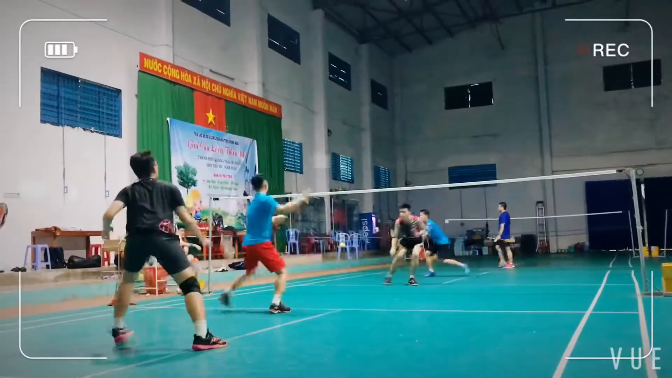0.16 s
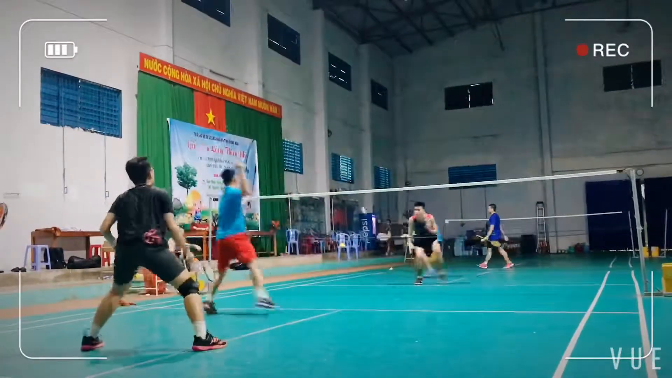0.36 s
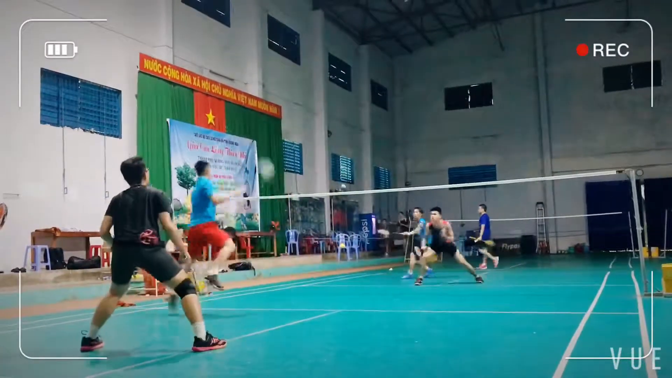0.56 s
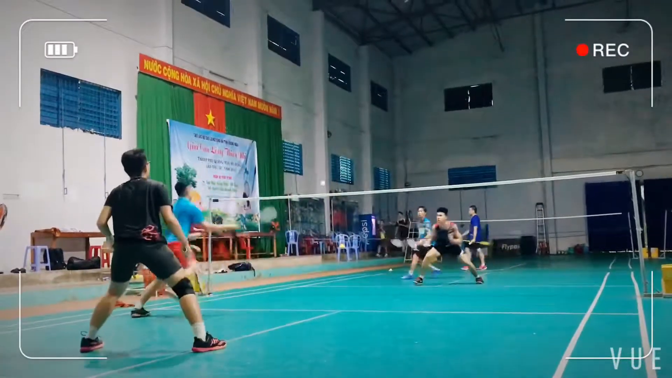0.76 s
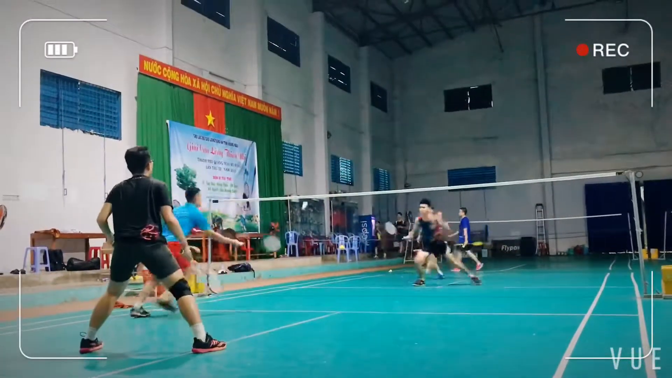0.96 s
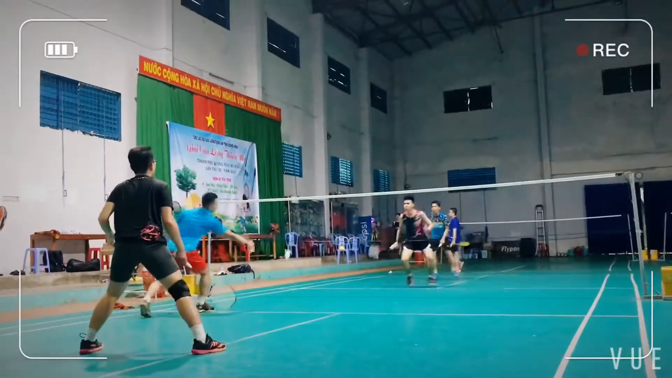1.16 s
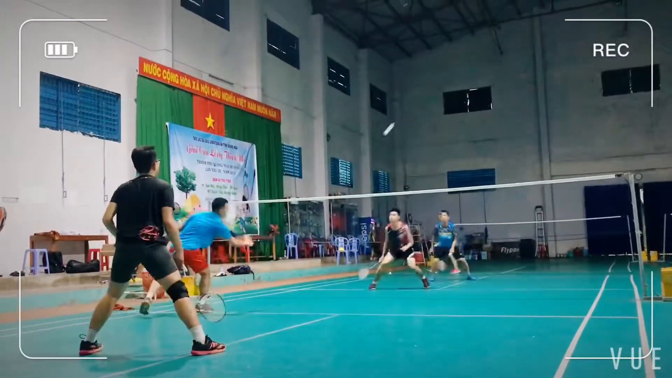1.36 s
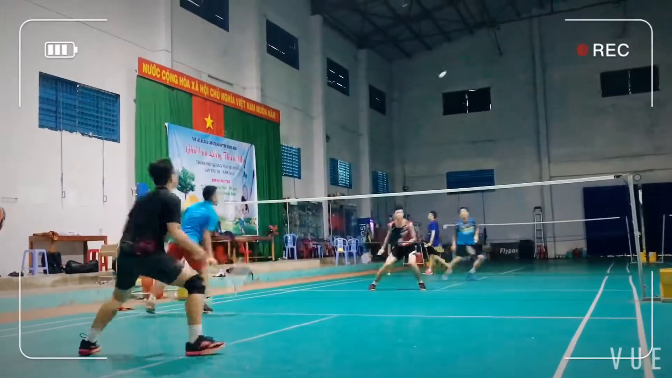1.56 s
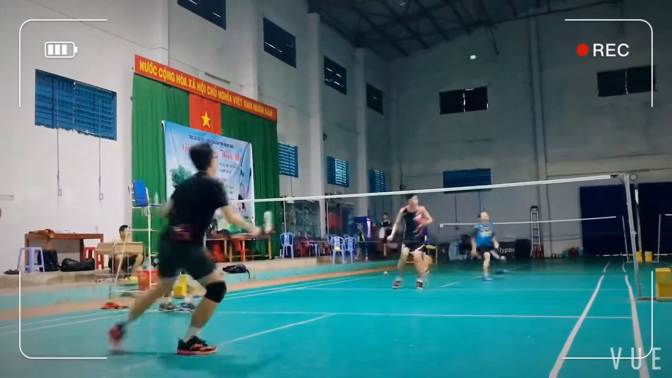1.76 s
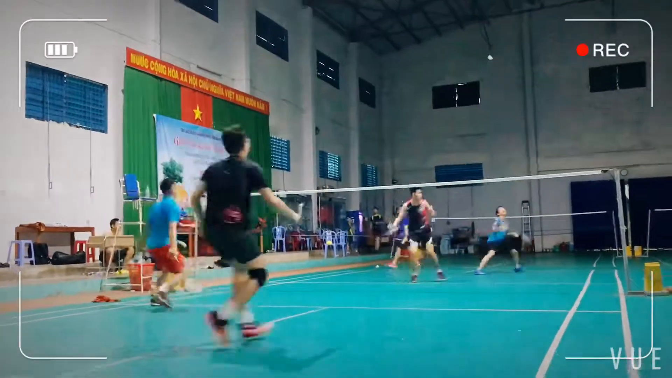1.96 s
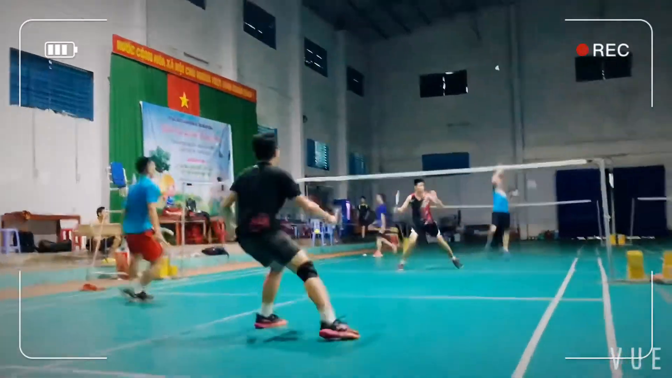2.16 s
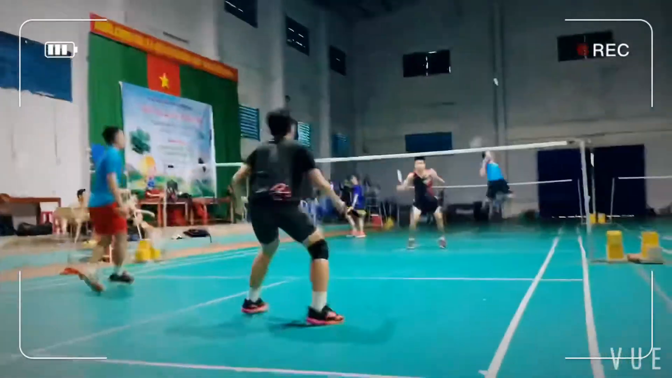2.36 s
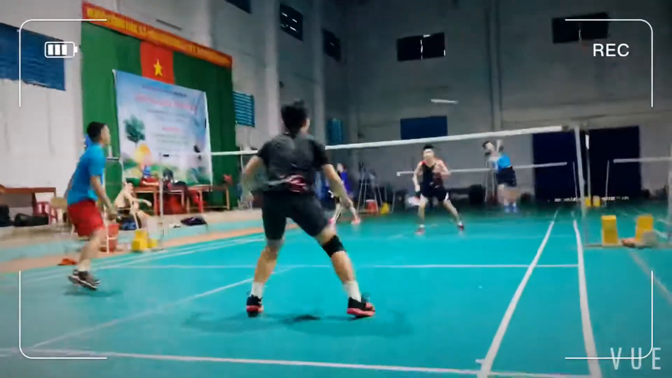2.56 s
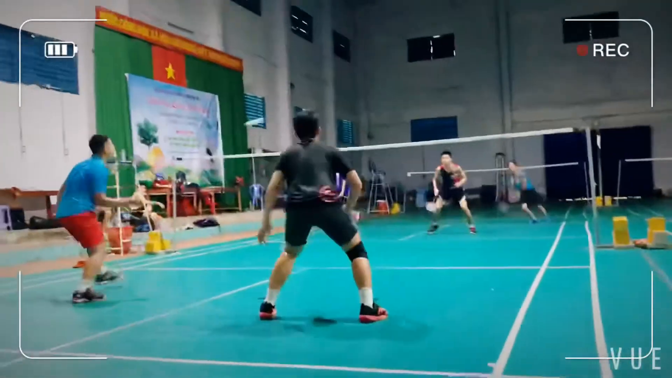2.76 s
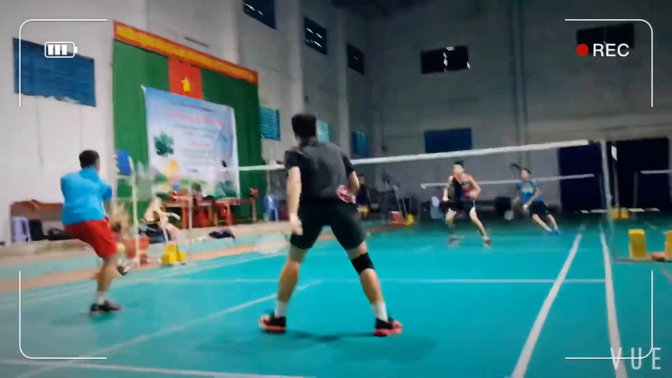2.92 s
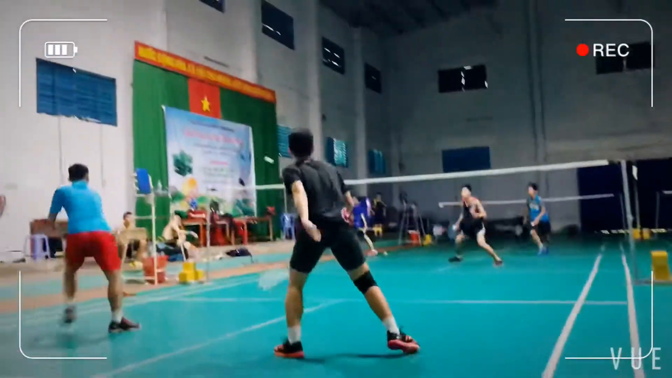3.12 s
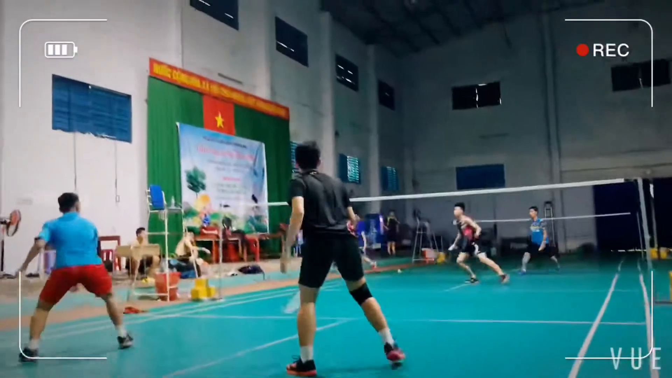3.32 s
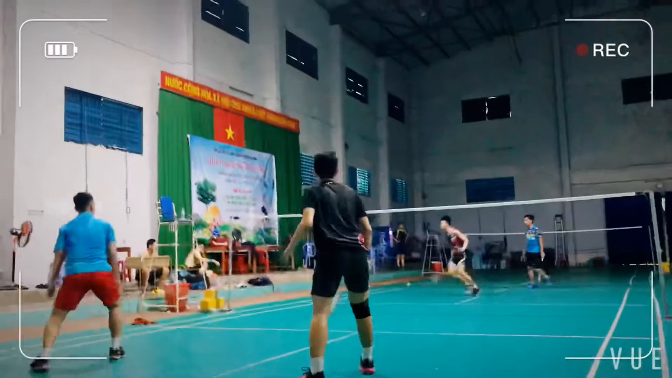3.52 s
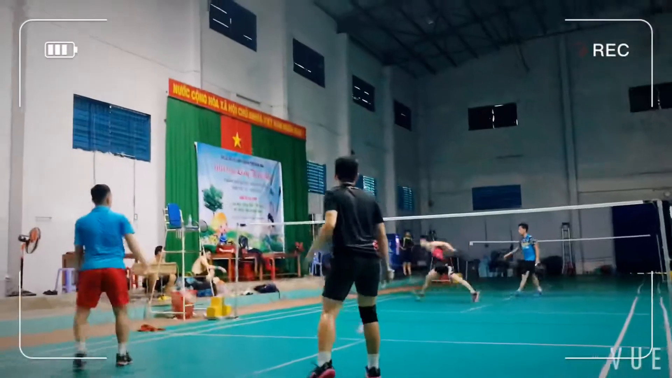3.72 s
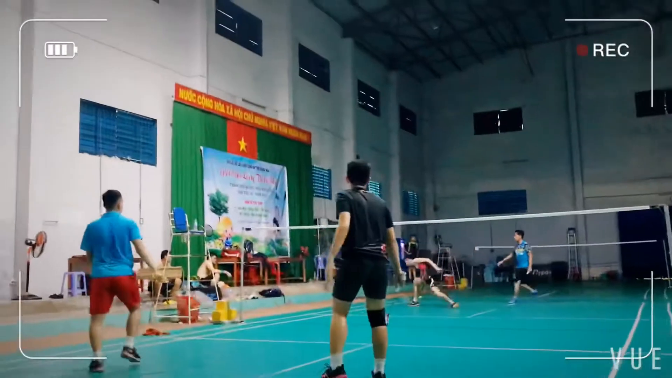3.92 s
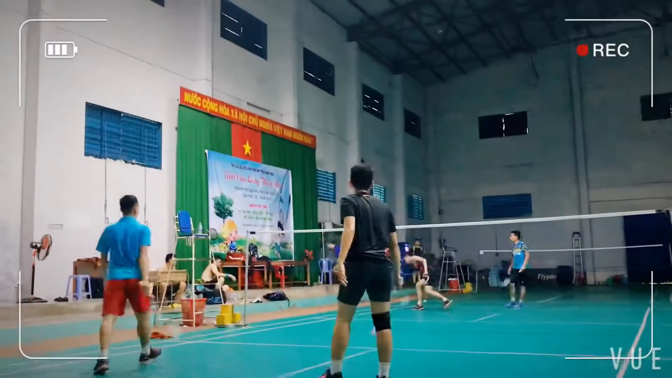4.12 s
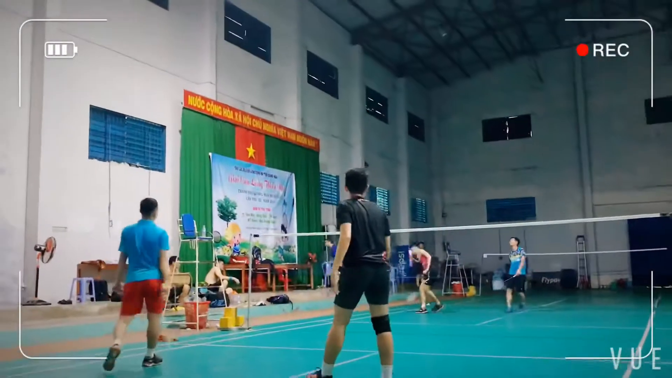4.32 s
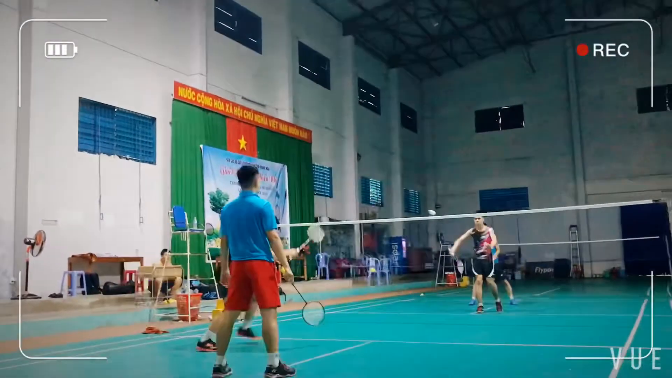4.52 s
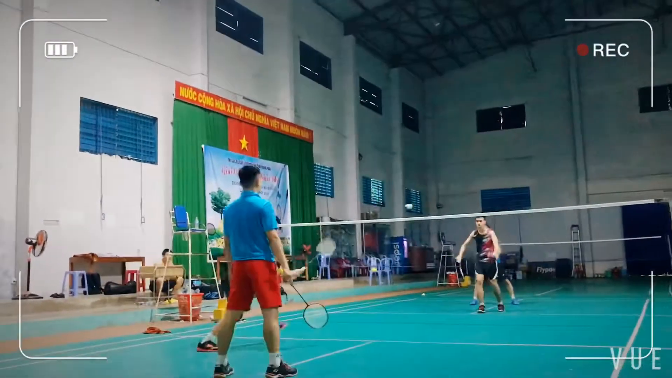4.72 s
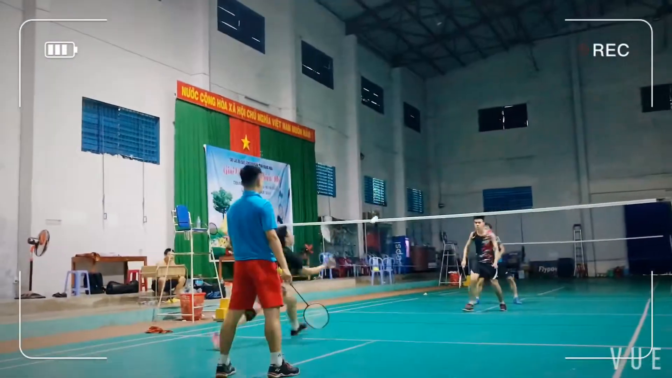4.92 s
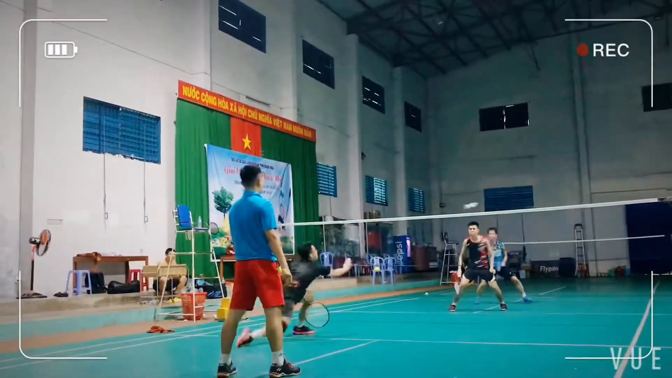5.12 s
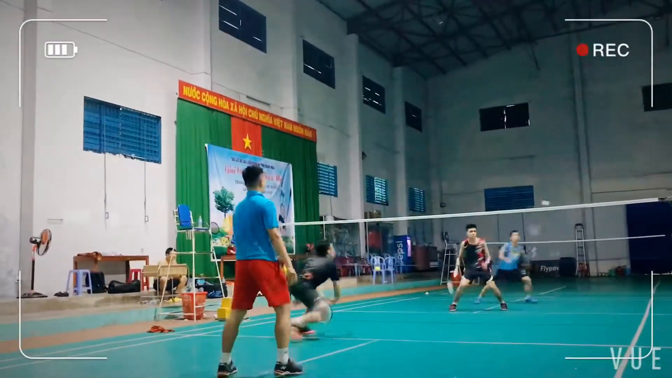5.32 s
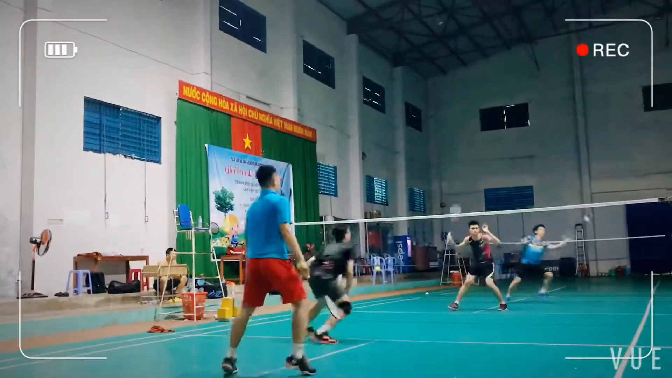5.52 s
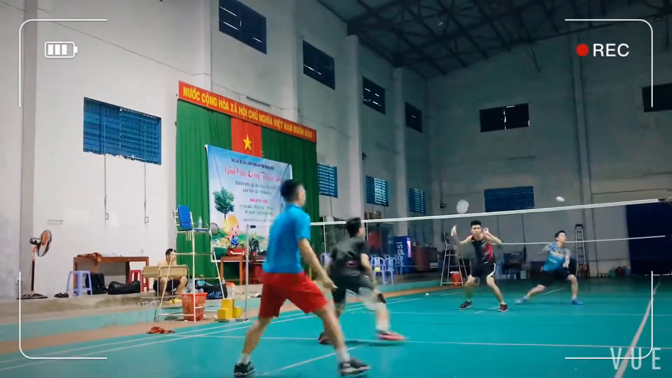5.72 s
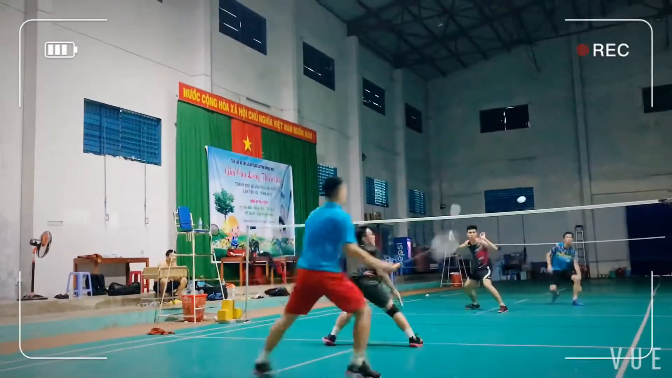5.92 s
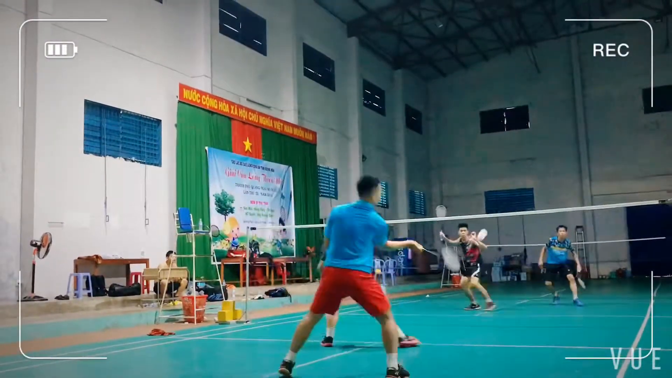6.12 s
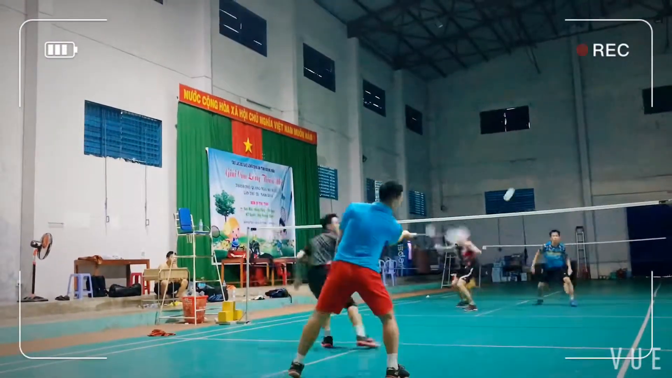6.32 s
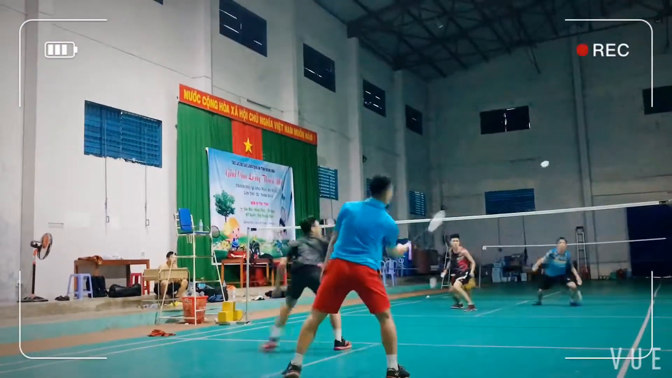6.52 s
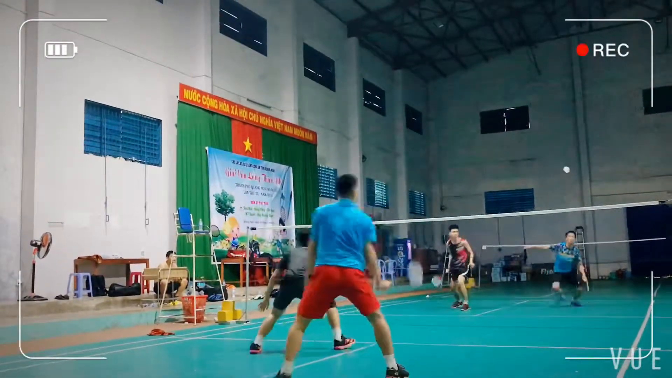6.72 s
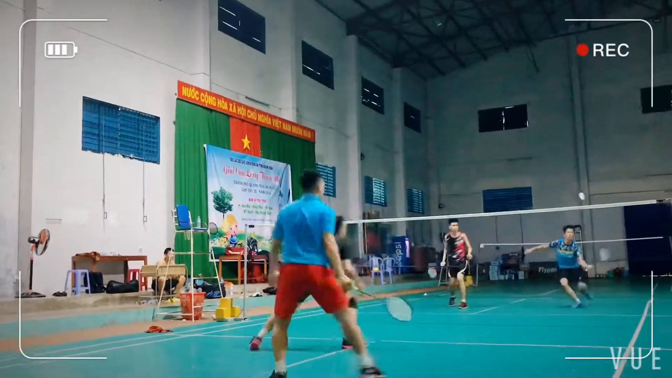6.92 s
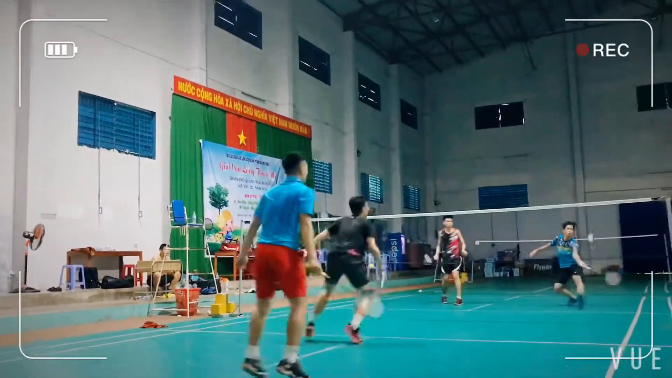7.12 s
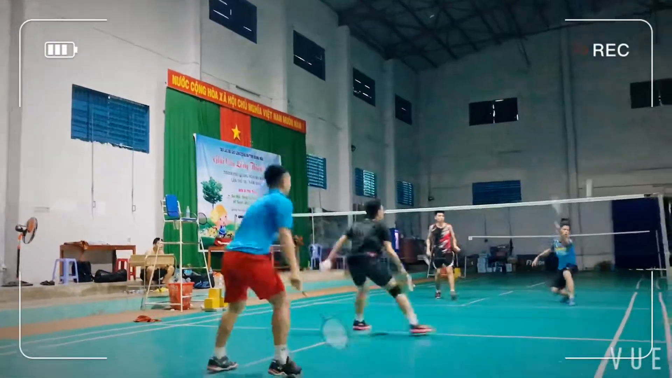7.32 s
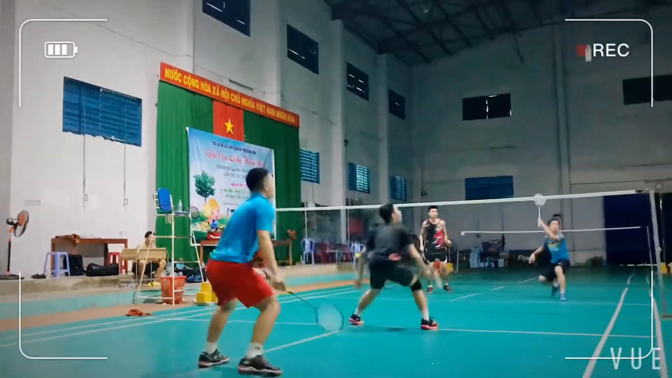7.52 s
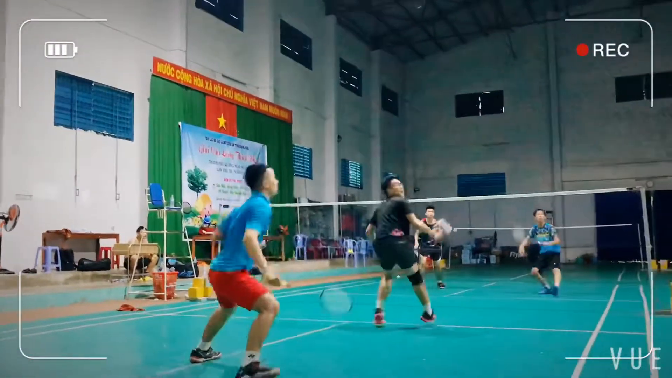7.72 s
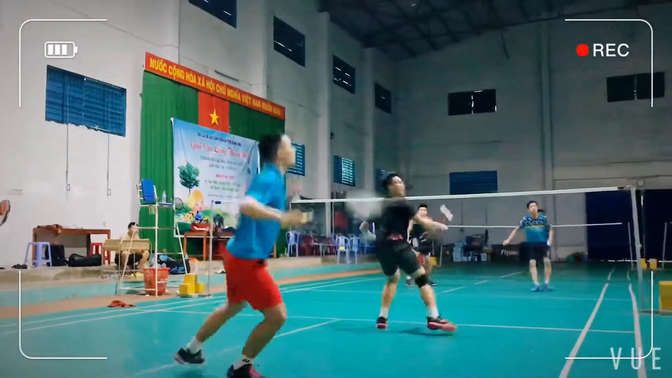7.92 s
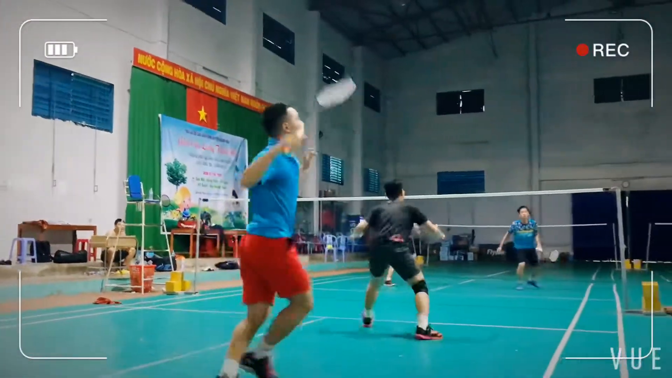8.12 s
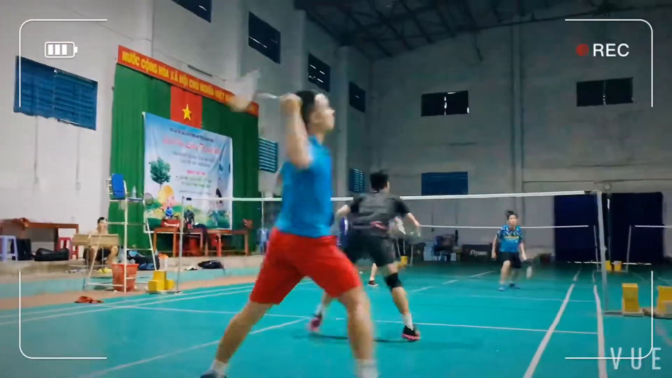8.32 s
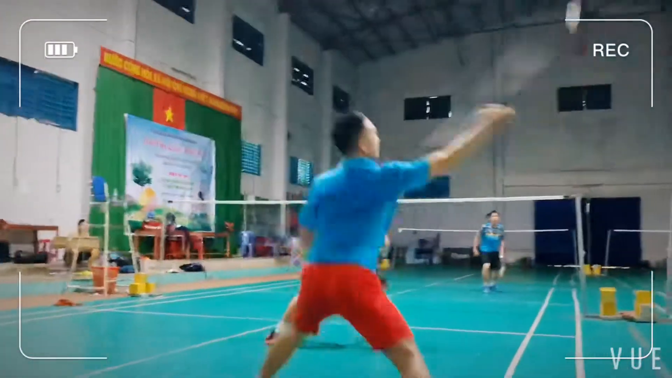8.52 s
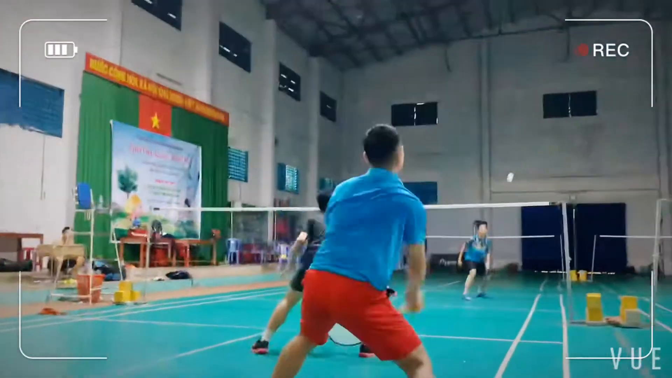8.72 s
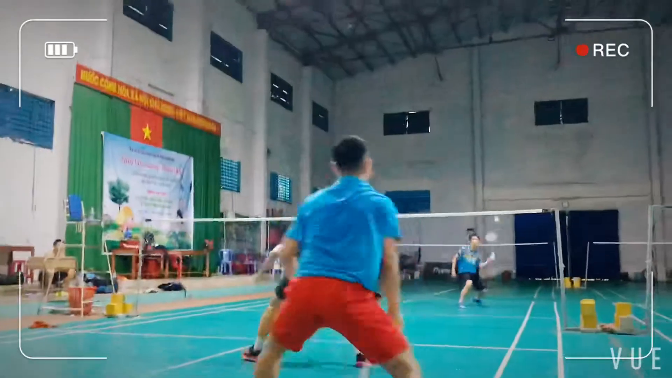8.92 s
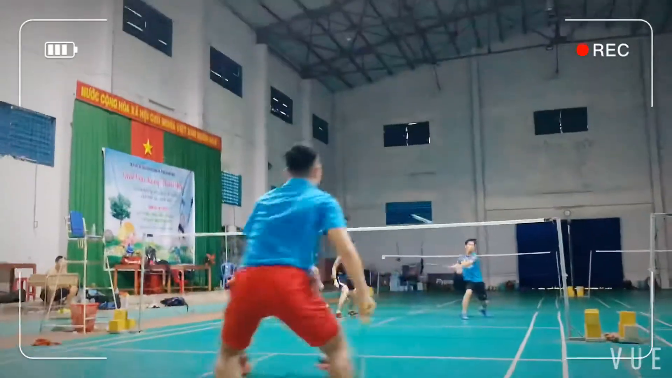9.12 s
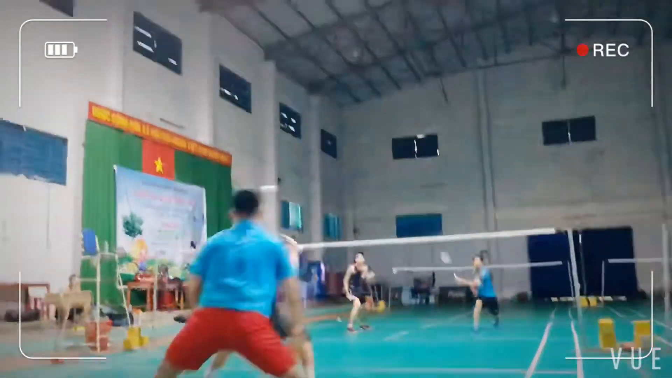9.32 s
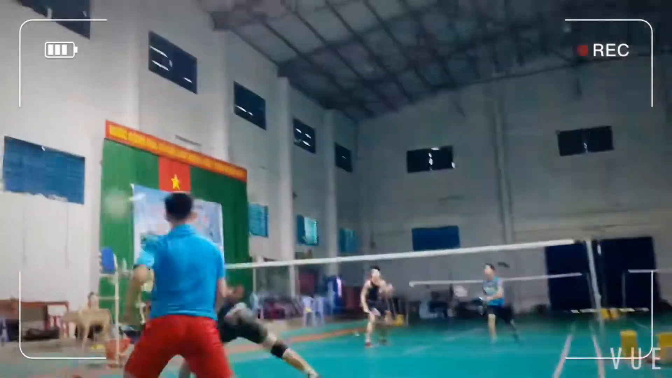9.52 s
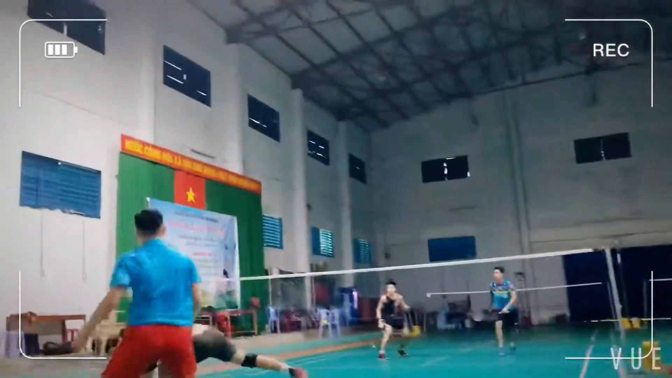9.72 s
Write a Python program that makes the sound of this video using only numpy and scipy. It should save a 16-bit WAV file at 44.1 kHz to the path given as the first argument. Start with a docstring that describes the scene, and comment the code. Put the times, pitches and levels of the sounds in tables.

```python
"""A large, hard-walled hall during a badminton rally, heard by one microphone behind the court.
Filtered noise makes the uneven background wash and rumble; a dying cloud of noise makes the hall ring on.
Light taps, mostly of shoes, are bursts of noise; landings thump with low sines, and rubber soles squeak
with gliding tones and their overtones.
Each racket stroke is one sharp click sent through resonances, with ringing strings and frame."""
import sys
import numpy as np
from scipy import signal
from scipy.fft import rfft, irfft, next_fast_len
from scipy.io import wavfile
from scipy.ndimage import uniform_filter1d, map_coordinates

SR = 44100
rng = np.random.default_rng(int(sys.argv[2]) if len(sys.argv) > 2 else 0)


def persist_wave(psi):
    """Save psi, clipped to +-1, as 16-bit WAV."""
    counts = np.round(np.clip(psi, -1, 1) * 32767).astype(np.int16)
    wavfile.write(sys.argv[1], SR, np.atleast_2d(counts).T)


N = 430857  # length in samples


def amp(db):
    """Turns decibels into a plain multiplier."""
    return 10 ** (np.asarray(db) / 20)


def unit(x):
    """Scales a sound to an average (RMS) strength of 1."""
    return x / np.sqrt(np.mean(x ** 2) + 1e-20)


def noise(size):
    """Plain white noise, a fresh random number for each sample."""
    return rng.standard_normal(size)


def along(points, hz):
    """Reads a curve of (Hz, value) points at any pitch, on a logarithmic pitch axis."""
    point_hz, value = np.transpose(points)
    return np.interp(np.log(hz + 1), np.log(point_hz + 1), value)


def filtered(x, response):
    """Multiplies the spectrum of x by a response, which is a function of frequency."""
    size = next_fast_len(x.shape[-1] + 8192)  # spare room for the filter to ring out
    spectrum = rfft(x, size) * response(np.fft.rfftfreq(size, 1 / SR))
    return irfft(spectrum, size)[..., :x.shape[-1]]


def resonance(centre_hz, width_hz):
    """The response of one damped resonator, which favours pitches near its centre."""
    return lambda f: 1j * f * width_hz / (centre_hz ** 2 - f * f + 1j * f * width_hz)


def wobble(size, rate):
    """A smooth random curve through a given number of random points a second."""
    points = noise(int(size * rate / SR) + 4)
    return map_coordinates(points, [np.arange(size) * rate / SR])


def ring(modes, t, scale=1, last=1):
    """Adds up dying sines, each at a slightly random strength."""
    total = 0
    for hz, db, t60 in modes:
        level_db = db + rng.normal(0, 2) - 60 * t / (t60 * last)
        total = total + amp(level_db) * np.sin(2 * np.pi * hz * scale * t)
    return total


def smeared(x, t60):
    """Scatters x off many small surfaces into a short cloud of copies that dies by 60 dB in t60 seconds."""
    size = SR // 10
    cloud = amp(-60 * np.arange(size) / SR / t60) * noise(size)
    return signal.fftconvolve(x, cloud / np.linalg.norm(cloud))[:len(x)]


def add(pair, s, sound, hall_db, near=0):
    """Lays a sound on the direct path and, hall_db apart, on the path into the hall; near is only direct."""
    start = round(s * SR)
    both = np.array([sound + near, amp(hall_db) * sound])[:, :N - start]
    pair[:, start:start + both.shape[1]] += both


def background():
    """A patchy wash and a lumpy rumble that rise and fall, with the wavering blade tone of fans."""
    # background level over time, with the stroke's ringing in the hall around 2.86 s:
    # start_s, rumble_db, wash_db
    background_levels = [(0.0, -46, -35), (0.73, -46, -36.5), (1.09, -46.5, -36), (2.2, -44, -36),
                         (2.72, -44, -37), (2.86, -44, -32), (3.7, -41, -35.5), (4.6, -43.5, -36),
                         (4.81, -39.5, -34.5), (5.58, -41.5, -33.5), (5.85, -38, -33.5), (8.05, -41.5, -34),
                         (8.3, -39, -35), (8.93, -39, -33), (9.77, -38.5, -33.5)]
    # balance of pitches in the wash: pitch_hz, level_db (per Hz)
    wash_colour = [(100, -40), (270, -5.5), (470, -11), (640, -4.5), (1300, -4), (1600, -5), (2500, -6),
                   (2900, -12.5), (4600, -18), (7000, -24.5), (7700, -29), (9300, -28.5), (10400, -38.5),
                   (12000, -31.5), (16000, -41)]
    # balance of pitches in the rumble: pitch_hz, level_db (per Hz)
    rumble_colour = [(12, -51), (20, -21), (30, -25), (48, 1), (134, 0.5), (184, -4.5), (245, -7),
                     (300, -23.5), (390, -31), (660, -120)]
    # blade tone of the fans: pitch_hz, width_hz, level_db
    fan_tone = (127.5, 1.6, -56.5)

    point_s, *columns = np.transpose(background_levels)
    rumble_db, wash_db = [np.interp(np.arange(N) / SR, point_s, column) for column in columns]

    # random patches of time and pitch make the wash uneven
    spectrum = signal.stft(noise(N), nperseg=512)[2]
    patches = uniform_filter1d(noise(spectrum.shape), 6, 0)
    patches = uniform_filter1d(patches, 12, 1)
    patchy = signal.istft(spectrum * amp(0.93 * unit(patches)), nperseg=512)[1][:N]

    wash = unit(filtered(patchy, lambda hz: amp(along(wash_colour, hz))))
    rumble = unit(filtered(noise(N), lambda hz: amp(along(rumble_colour, hz))))
    fan_hz, width_hz, fan_db = fan_tone
    blade = unit(filtered(noise(N), resonance(fan_hz, width_hz)))

    wash = amp(wash_db + 0.39 * wobble(N, rate=24)) * wash
    rumble = amp(rumble_db + 1.3 * wobble(N, rate=6.6)) * rumble
    return wash + rumble + amp(fan_db) * blade


def hall(x):
    """Echoes too dense to tell apart: a tail of noise that builds up, then dies, each pitch at its own pace."""
    # how long the hall rings: pitch_hz, t60_s (time to die by 60 dB)
    hall_ring = [(100, 5), (300, 7.3), (1000, 3.4), (3000, 3.75), (7000, 2.7), (14000, 0.93)]
    hz, t, spectrum = signal.stft(noise(3 * SR), SR, nperseg=256)
    build = 1 - np.exp(-(t / 0.021) ** 2)
    decay = amp(-60 * t / along(hall_ring, hz)[:, None])
    tail = signal.istft(spectrum * build * decay, SR, nperseg=256)[1]
    return signal.fftconvolve(x, tail / np.linalg.norm(tail))[:N]


def taps():
    """Light taps and scuffs: a short puff of gritty noise with a duller slap."""
    # light taps and scuffs, mostly of shoes; the one at 2.679 may be a stroke's echo:
    # start_s, grit_db, slap_db (over the grit)
    tap_list = [(0.3585, -40, 19), (1.311, -31, -6), (1.409, -31, 4), (2.116, -43, -1), (2.6195, -40, 11),
                (2.679, -22, -7), (3.0121, -33.5, -21), (5.310, -47, 21), (5.696, -27.5, -4),
                (5.761, -34, 16), (6.313, -32, -16), (7.367, -34, 5), (8.188, -41.5, 9), (8.4965, -29, 11),
                (8.559, -43.5, 13), (9.281, -31, 3), (9.723, -35, 12.5)]
    rise_s, decay_s = 0.00022, 0.0017
    pair, t = np.zeros((2, N)), np.arange(SR // 16) / SR
    shape = (1 - np.exp(-t / rise_s)) * np.exp(-t / decay_s)
    for s, grit_db, slap_db in tap_list:
        grit = unit(filtered(noise(len(t)), resonance(9700, 12000)))
        slap = unit(filtered(noise(len(t)), resonance(2800, 1700)))
        add(pair, s, amp(grit_db) * (grit + amp(slap_db) * slap) * shape, hall_db=-9)
    return pair


def thumps():
    """Landings on the mat: the sprung floor gives one low push, a sine that dies fast."""
    # landings: start_s, level_db, floor_hz, t60_s (time to die by 60 dB), hall_db
    landings = [(4.683, -24.5, 132, 0.066, -16), (5.691, -16, 127, 0.032, -10),
                (5.761, -6.5, 261, 0.019, 1.5), (6.424, -21, 130, 0.039, -3.5), (9.179, -31, 217, 0.068, 5),
                (9.372, -28, 164, 0.06, 3), (9.519, -42, 165, 0.06, 2), (9.72, -6.5, 163, 0.021, 4.5)]
    pair, t = np.zeros((2, N)), np.arange(SR // 4) / SR
    rise = 1 - np.exp(-t / 0.0016)
    for s, level_db, floor_hz, t60, hall_db in landings:
        push = np.sin(2 * np.pi * floor_hz * t) * rise
        add(pair, s, amp(level_db - 60 * t / t60) * push, hall_db)
    return pair


def squeaks():
    """Rubber sticks and slips thousands of times a second; two patches of sole beat, uneven grip shakes them."""
    # squeaks: loudest_s, swell_s, fade_s, first_hz, loudest_hz, last_hz (slip rates), tone_db,
    # unsteadiness (0-1), second_overtone_db, loss_db (each further overtone),
    # second_patch_ratio (its slip rate over the first), second_patch_db, hall_db
    squeak_list = [ (0.055, .007, 0.0068, 3000, 3350, 3400, -29, 0.63, -16, 13, 0.86, -6, -16),
                   (0.074, .013, 0.026, 3480, 2990, 2950, -30.5, 0.24, -9.5, 12, 1.3, -18, -6),
                   (0.364, .004, 0.02, 3780, 3500, 3580, -27, 0.26, -17, 21, .83, -5, -14),
                   (1.183, .007, .011, 3680, 3690, 3660, -44, 0.22, -3, 9, 1.2, -12, 10.5),
                   (1.202, .012, 0.016, 3557, 3180, 2910, -32.5, 0.49, -12, 16, 1.07, -8, 0.5),
                   (1.706, .008, 0.0086, 2240, 2237, 2330, -34.5, 0.45, -11, 5, 1, -10, -1.5),
                   (2.553, .008, 0.02, 3454, 3365, 3530, -30, .6, -9, 26, 1.11, -3, -2.5),
                   (2.569, .009, 0.034, 3560, 3480, 3200, -16.5, 0.14, -16, 15, 1, -6, -21),
                   (2.599, .008, 0.0072, 3140, 2910, 2670, -25, 0.28, -17, 13, 1.2, -8, -18),
                   (3.098, .008, 0.0095, 2750, 2420, 2390, -29, .2, -17, 4, 1.04, -12, -30),
                   (4.642, .009, 0.016, 2490, 2460, 2370, -35, 0.24, -7.5, 2.5, 1.02, -7, -8),
                   (5.345, .007, 0.01, 2680, 2595, 2560, -28.5, 0.1, -11, 13, 1.2, -18, -23),
                   (5.79, .03, 0.018, 3700, 3370, 3320, -25.5, .22, -11.5, 1.5, 1.12, -12, -7),
                   (5.807, .012, 0.014, 3020, 2923, 2890, -17, 0.18, -14, 10, 1.16, -9, -11),
                   (5.881, .011, 0.0097, 2844, 2827, 3040, -20, 0.49, -10.5, 9.5, 1.05, -2, -9),
                   (6.093, .008, 0.013, 2710, 2660, 2580, -31, 0.33, -7, 16, .95, -9, -19),
                   (6.159, .005, 0.014, 3140, 3000, 2720, -33, 0.48, -5, 15, 1.04, -4, -5.5),
                   (6.957, .006, 0.0083, 2570, 2500, 2470, -38, .33, -2.5, 19, 0.83, -8, 3),
                   (7.211, .006, .016, 3800, 3630, 3270, -33, .2, -15, 10, 1.17, -16, -4.5),
                   (7.495, .009, 0.011, 2870, 2845, 2370, -23.5, .4, -10, 1.5, 1.16, -6.5, -7.5),
                   (7.899, .005, 0.0055, 3430, 3220, 3110, -20, 0.14, -3, 23, 1.12, -23, -14),
                   (8.163, .011, 0.02, 2600, 2638, 2620, -35.5, 0.34, -3.5, 11, 1.01, -10, 3),
                   (8.486, 0.0087, 0.019, 2445, 2290, 2410, -27, 0.57, -8, 12, 0.86, -14, -3),
                   (8.503, .018, .021, 2562, 2567, 2600, -24.5, 0.64, -12.5, 6, 1.2, -7.5, -13)]
    # scraping noise: steady_grip_db, gain_db (at full unsteadiness)
    scrape_levels = (-29, 29)
    edge_db, edge_shape = 8, 1.58  # level lost at either end; roundness of the swell
    pair = np.zeros((2, N))
    for (s, swell, fade, first_hz, peak_hz, last_hz, tone_db, rough,
         second_db, loss_db, ratio, patch_db, hall_db) in squeak_list:
        t = np.arange(-swell, fade, 1 / SR)  # zero at the loudest moment
        hz = np.interp(t, [-swell, 0, fade], [first_hz, peak_hz, last_hz])
        sag_db = -edge_db * np.abs(np.where(t < 0, t / swell, t / fade)) ** edge_shape

        overtones_db = [0, *(second_db - loss_db * np.arange(4))]  # the first is the slip rate itself
        tone = 0
        for rate_hz, level_db in ((hz, 0), (hz * ratio, patch_db)):
            shaken_hz = rate_hz * (1 + 0.09 * rough * wobble(len(t), rate=524))
            phase = 2 * np.pi * np.cumsum(shaken_hz) / SR
            for number, overtone_db in enumerate(overtones_db, start=1):
                shake_db = 8.0 * rough * wobble(len(t), rate=382)
                tone = tone + amp(level_db + overtone_db + shake_db) * np.sin(number * phase)

        steady_db, gain_db = scrape_levels
        scrape = unit(filtered(noise(len(t)), resonance(4100, 12000)))
        scrape = amp(steady_db + gain_db * rough) * scrape
        edges = np.clip(np.minimum(t + swell, fade - t) / 0.0025, 0, 1)  # no clicks at the ends
        squeak = edges * amp(tone_db + sag_db) * (np.sqrt(2) * tone + scrape)
        add(pair, s - swell, squeak, hall_db)
    return pair


def strokes():
    """Cork on strings: a sharp crack, ringing strings and frame, a rustle of feathers, bounces off mat and wall."""
    # racket strokes: start_s, level_db, string_bed_hz, bed_db, frame_db, crack_db, treble_db, rustle_db,
    # hall_db, mat_delay_ms, facing_wall_delay_ms
    stroke_list = [(2.6493, -5, 1045, -11, -10, -12, -7, -20, 0.5, 1.95, 48),
                   (5.0302, -12, 1010, -11, -6.5, -8, 7, -23, -1, 1.1, 84),
                   (6.4307, -18, 1034, -10, -10, -7, 9, -16, 4, 2, 45),
                   (8.6533, -5, 1166, -9, -11, -9, -2, -9, -4.5, 2.5, 66),
                   (9.1846, -22, 1240, -14, -3, -4, 7, -10, -2, 2.4, 40),
                   (9.6613, -17.5, 1060, -16, -21, -10, 8, -8, 1, 2, 40)]
    # string tones: pitch_ratio (multiple of the bed pitch), level_db, ring_share (of the bed's ring time)
    string_tones = [(1, 5.5, 1), (1.6, -30, .6), (2.3, -17, .6)]
    # frame tones: pitch_hz, level_db, t60_s (time to die by 60 dB)
    frame_tones = [(147, -50, .04), (260, -32, 0.073), (368, -3, 0.036), (730, 18.5, 0.0033)]
    # broad body of the crack: pitch_hz, width_hz, level_db
    cork_bands = [(1204, 357, 37.5), (2850, 1840, 30.5), (5700, 9600, 22.5)]
    bed_t60_s, thud_db, wall_db = 0.019, 34.5, -10  # string ring; air push over the frame; wall echo

    def crack_response(f):
        """Sums the cork's resonances, every other one upside down."""
        return sum((-1) ** k * amp(db) * resonance(hz, width)(f)
                   for k, (hz, width, db) in enumerate(cork_bands))

    pair, t = np.zeros((2, N)), np.arange(SR // 4) / SR
    contact = 1. * (t == 0)  # a click one sample long
    body = filtered(contact, crack_response)
    snap = filtered(contact, lambda f: resonance(14500, 7000)(f) ** 2)
    thud = filtered(contact, lambda f: -resonance(280, 330)(f) ** 2)  # the air pushed by the racket head
    soft = 1 - np.exp(-t / 0.00011)  # a very short rise

    for (s, level_db, bed_hz, bed_db, frame_db, crack_db, treble_db, rustle_db,
         hall_db, mat_ms, wall_ms) in stroke_list:
        frame = amp(frame_db) * ring(frame_tones, t) * soft
        strings = amp(bed_db) * ring(string_tones, t, bed_hz, bed_t60_s) * soft
        crack = amp(crack_db) * body + amp(treble_db) * snap
        blow = strings + amp(frame_db + thud_db) * thud + crack

        feathers = unit(filtered(noise(len(t)), resonance(5600, 3500)))
        rustle = amp(rustle_db - 60 * t / 0.022) * feathers

        mat = amp(-5) * np.roll(blow, round(mat_ms * SR / 1000))
        # players, net and benches
        nearby = amp(-4.5) * np.roll(smeared(blow, 0.039), round(.004 * SR))
        echo = filtered(smeared(blow, .012), resonance(bed_hz, 900))
        wall = amp(wall_db) * np.roll(echo, wall_ms * SR // 1000)

        near = amp(level_db) * (frame + rustle + mat + nearby + wall)
        add(pair, s, amp(level_db) * blow, hall_db, near=near)
    return pair


def scene():
    """Each kind of sound comes from its own places, so each meets its own echoes."""
    played = background()
    for direct, into_hall in (taps() + thumps(), squeaks(), strokes()):
        played = played + direct + hall(into_hall)
    return np.tile(played, (2, 1))


def record(dry):
    """One microphone on both channels: deep bass cut, soft clipping at full scale, then a treble limit."""
    top_hz = 15900
    # removes constant offset and the deepest bass
    dry = filtered(dry, lambda hz: (1j * hz / (22 + 1j * hz)) ** 2)
    clipped = dry / (1 + np.abs(dry) ** 6) ** (1 / 6)
    return filtered(clipped, lambda hz: hz < top_hz)


dry = scene()
out = record(dry)
persist_wave(out)
```